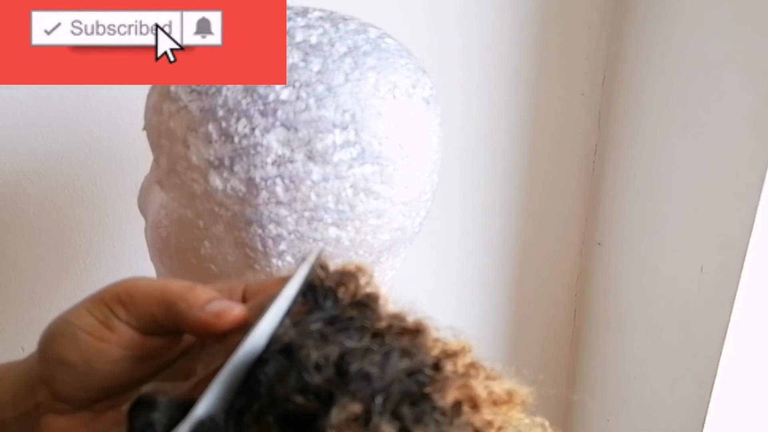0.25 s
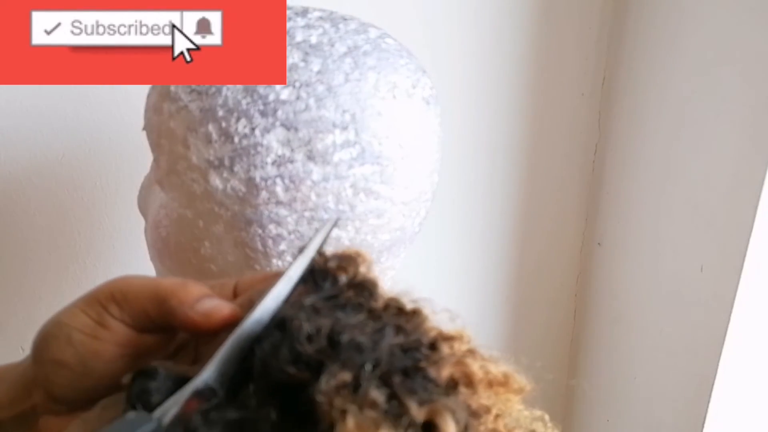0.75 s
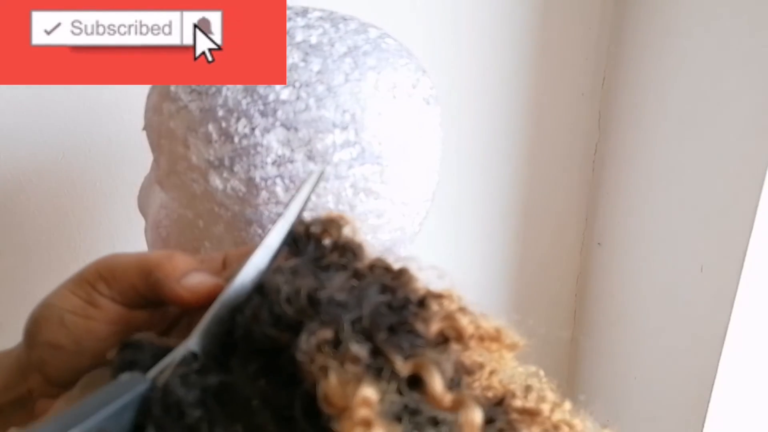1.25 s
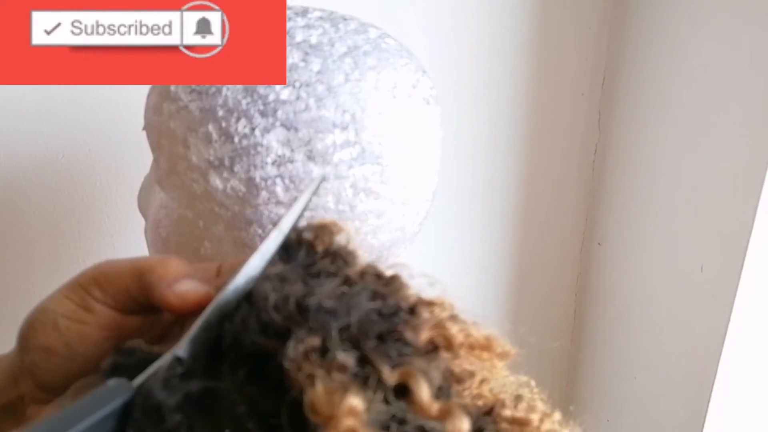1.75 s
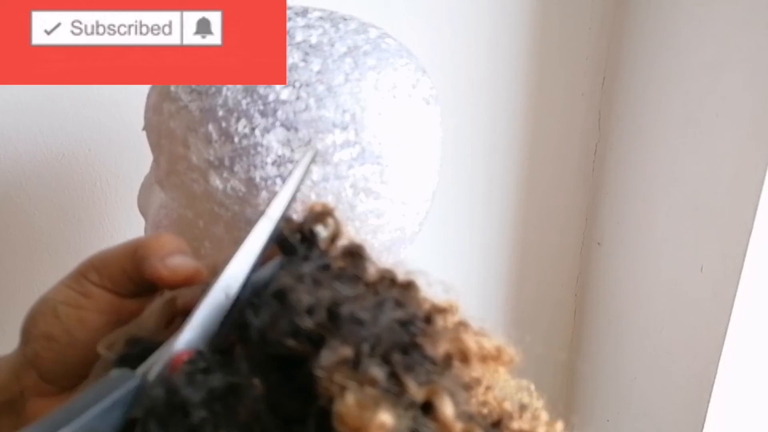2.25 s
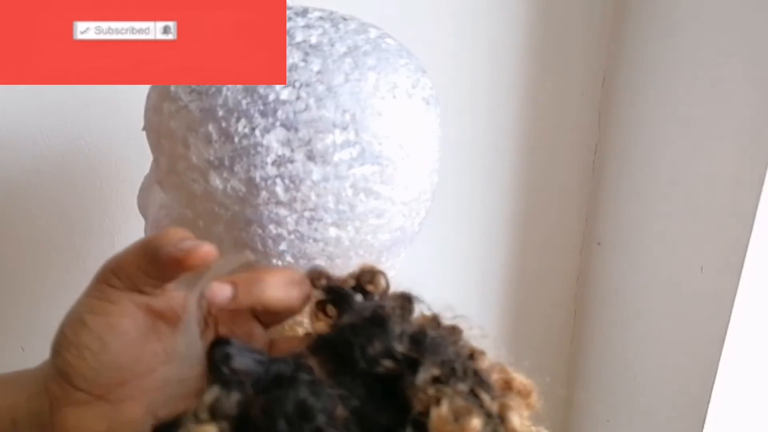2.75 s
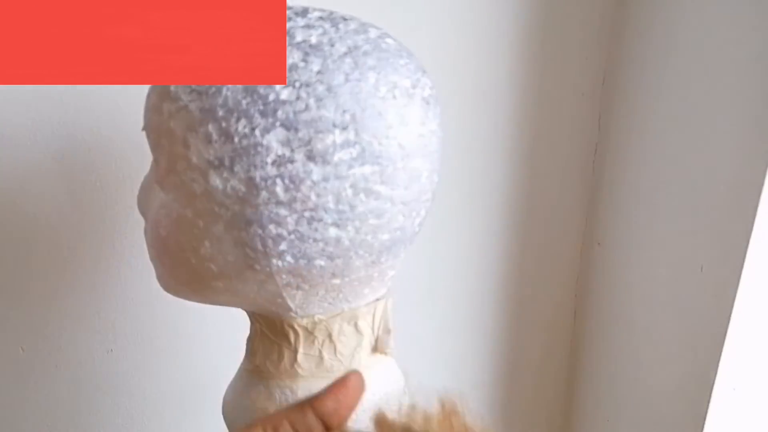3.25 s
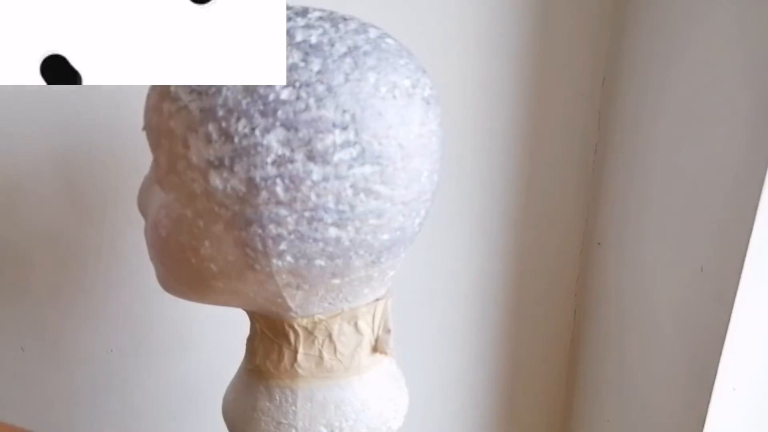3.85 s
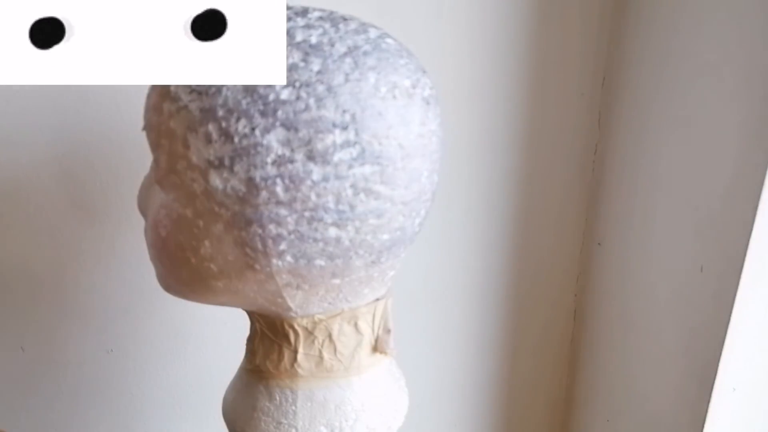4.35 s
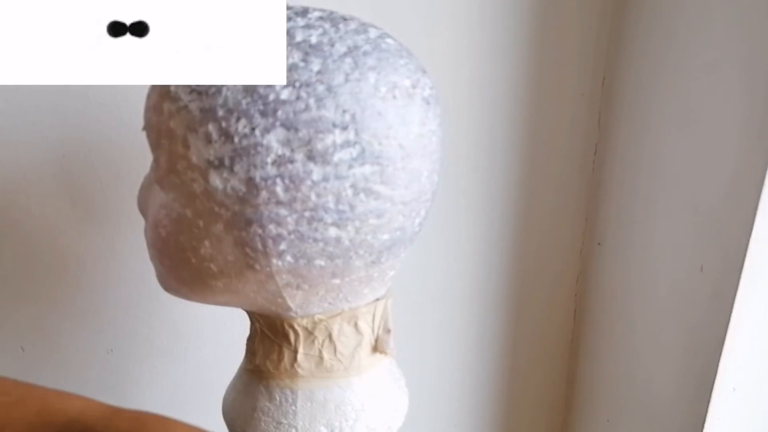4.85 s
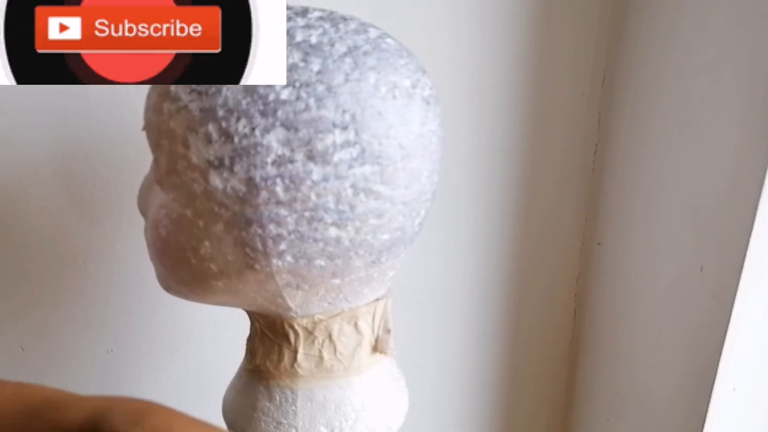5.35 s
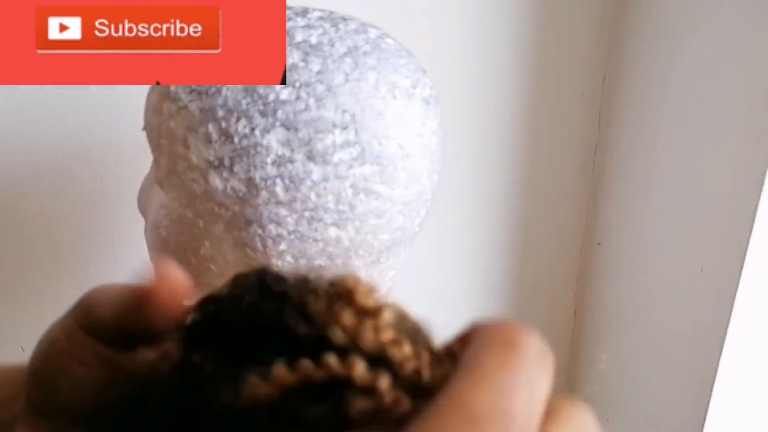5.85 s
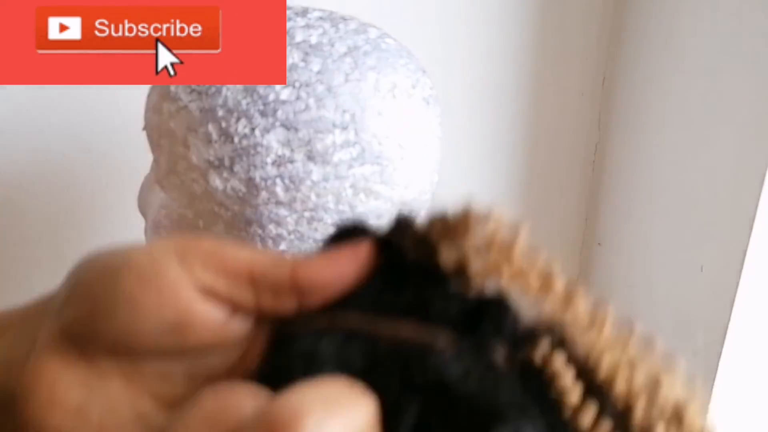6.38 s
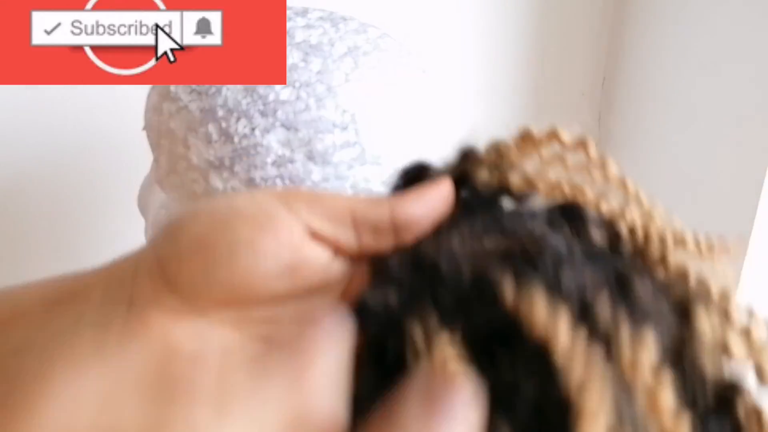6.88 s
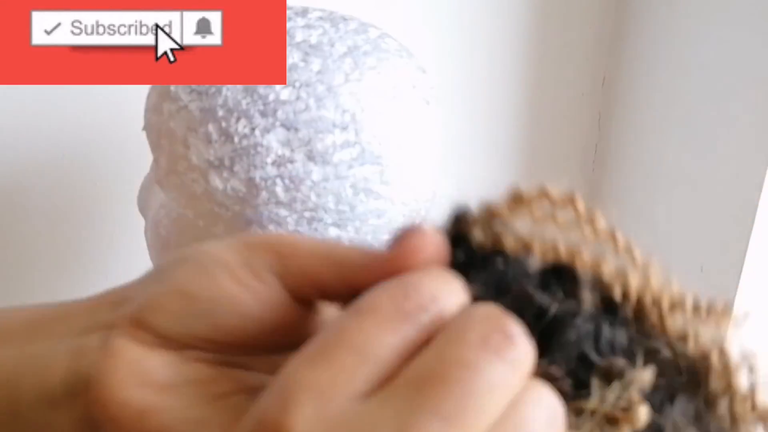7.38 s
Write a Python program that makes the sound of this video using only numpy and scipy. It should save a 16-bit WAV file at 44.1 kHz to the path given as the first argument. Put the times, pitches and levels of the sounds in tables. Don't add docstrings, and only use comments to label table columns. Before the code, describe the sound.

Crisp, dry clusters of snapping strands, mostly towards the left, as scissors bite through a wig. Faint hollow knocks sit further off. Hissing fibres swell as the wig is turned and moved away, metal scissors clack and chatter on a wooden surface, then quiet handling returns with airy rustles. Stereo phone pickup, slightly reverberant small room, light background hiss.

```python
import sys
import numpy as np
from scipy import signal
from scipy.fft import rfft, irfft
from scipy.io import wavfile
from scipy.ndimage import uniform_filter1d

SR = 44100
rng = np.random.default_rng(int(sys.argv[2]) if len(sys.argv) > 2 else 0)


def attenuation_scalar(level_db):
    decades = np.asarray(level_db, float) / 20
    return 10 ** decades


def materialize(psi):
    bounded = np.clip(np.atleast_2d(psi).T, -1, 1)
    quanta = np.round(bounded * 32767).astype(np.int16)
    wavfile.write(sys.argv[1], SR, quanta)


N = 335953

# (peak [s], rise [s], fall [s], crunch [dB], left minus right [dB])
BITES = [(0.73, 0.028, .3, -63.5, 6), (0.86, .02, .03, -55, 5), (0.878, 0.0088, 0.04, -43, 3),
         (0.897, 0.033, 0.016, -44.5, 5), (0.92, .01, 0.049, -46, 4.5), (0.957, .015, 0.04, -47, 12),
         (0.995, .02, 0.036, -53, 4), (1.06, 0.011, 0.022, -53, 11), (1.25, 0.046, .03, -60, 19),
         (1.275, .03, 0.096, -56, 4), (1.45, 0.034, .2, -64, 12), (1.52, 0.099, 0.046, -51, -1),
         (1.558, 0.023, 0.042, -46, 6.5), (1.612, .008, .03, -47, 13), (1.63, 0.011, .012, -38, 7.5),
         (1.651, 0.025, 0.024, -46.5, 18), (1.9, .005, 0.016, -49, 5), (2.03, 0.023, 0.022, -49, 16),
         (2.07, 0.031, 0.027, -36, 5), (2.095, .01, 0.012, -36, 7), (2.12, .02, .02, -44, 0),
         (2.14, 0.016, 0.13, -45.5, -13.5)]
# (time [s], peak [dB], left minus right [dB])
TICKS = [(0.849, -34, 7), (0.8579, -41, 9), (0.863, -30, 4), (0.8674, -36, 5), (0.873, -27, 8),
         (0.881, -26, 5), (0.889, -36, 10), (0.8921, -30, 8), (0.8957, -26.5, 11), (0.9096, -42, 2),
         (0.9148, -26, 14), (0.9212, -34, 2), (0.927, -32, 3), (0.936, -30, 10), (0.9443, -31, 8),
         (0.949, -16.5, 8), (0.953, -25, 13), (0.96, -28, 7), (0.966, -35, 6), (0.97, -38, 6),
         (0.9756, -41, 2), (0.9814, -43, 0), (0.9886, -39, 9), (0.9937, -27, 8), (1.0092, -41, 1),
         (1.0399, -47, 6), (1.0562, -33, 13), (1.062, -32, 7), (1.0658, -32, 8), (1.083, -35, 14),
         (1.4408, -37, 7), (1.444, -46, 10), (1.4497, -45, 11), (1.4648, -41, 10), (1.4722, -40, 6),
         (1.4761, -31, 6), (1.4846, -36, 6), (1.517, -28, 8), (1.5531, -33, 10), (1.5561, -35, 3),
         (1.5586, -28.5, 10), (1.5637, -36, 6), (1.5983, -35, 8), (1.6028, -36, 12), (1.6097, -35, 9),
         (1.6157, -37, 7), (1.6193, -36, 6), (1.6252, -28, 11), (1.632, -23, -2), (1.6405, -27, 7),
         (1.6437, -36, 13), (1.6477, -16, 7), (1.6532, -21, 3), (1.6574, -32, 7), (1.6594, -23, 9),
         (1.6775, -34, 13)]
# (time [s], peak [dB])
BUNDLES = [(2.0166, -41), (2.0216, -35), (2.0252, -33), (2.0278, -42), (2.0331, -25), (2.042, -14.5),
           (2.0458, -22), (2.0533, -19), (2.0592, -18), (2.062, -15), (2.0653, -18), (2.0674, -9.5),
           (2.0755, -11), (2.0812, -17), (2.0886, -19), (2.0998, -22), (2.1022, -31), (2.1072, -29),
           (2.11, -26), (2.113, -17), (2.1155, -14), (2.1182, -15), (2.123, -14), (2.1248, -20),
           (2.1265, -17.5), (2.13, -27),
           (2.0588, -12), (2.0897, -10), (2.071, -24), (2.073, -17), (2.079, -25), (2.083, -20),
              (2.0925, -15), (2.094, -19), (2.097, -15), (2.134, -29), (2.14, -28)]
# (time [s], peak [dB], relative top octave [dB], left minus right [dB])
SNAPS = [(0.202, -36, -23, -1), (0.5235, -38.5, -1, 7), (0.717, -38, -14, -1), (0.7553, -31.5, -22, -3),
         (0.76, -36, -22, 2), (0.818, -37.5, -19, -2), (1.2258, -36, -3, -1), (1.2426, -37, -10, 4),
         (1.258, -22.5, 7.5, 6.5), (2.438, -34, -20, 7), (2.678, -40, -17, 0), (2.7044, -44, -17, 0),
         (2.903, -37, -17, 0), (3.27, -30, -19, -2), (3.274, -22, -19, -7), (3.2903, -22, -19, 0),
         (3.3267, -26, -21, 5), (3.3516, -26, -12, 3), (3.3724, -33, -17, 0), (3.3782, -28, -17, -6),
         (3.385, -38, -17, 0), (4.446, -40, -28, -13), (5.9142, -39, -11.5, 6), (6.4189, -36.5, -6, 13),
         (6.4859, -39, -14, 10), (6.5774, -35, -20, 0), (6.7576, -37, -11, 10), (6.7657, -33, -17, 3),
         (6.7714, -45.5, -22.5, 3), (7.0442, -40, -17, 4.5), (7.0855, -38, -17, 0), (7.4177, -40, -22.5, 9),
         (7.427, -39, -22, -2)]
# (time [s], peak [dB], relative top octave [dB], left minus right [dB])
THREADS = [
    (2.3708, -31, -10, 8),
    (3.3584, -23.5, -21, -11),
]
# (frequency [Hz], level [dB])
CUT_TONE = [(1500, -60), (2500, -47), (4000, -34), (5300, -17), (6000, 0), (9000, 4.5), (10800, -18),
            (11900, -22)]
# (frequency [Hz], left [dB], right [dB])
CUT_SHADE = [(7050, -0.5, -1), (7440, -3.5, -3), (8400, 0.5, -10.5), (9800, -3.5, -4), (10500, 4.5, -9),
             (12100, -6, 3), (12500, -6, -20), (14700, 7, 4)]
# (peak [s], rise [s], fall [s], rustle [dB], left minus right [dB])
STROKES = [(0.0, .1, 0.45, -62, -4.5), (0.2, 0.051, 0.3, -64, -4.5), (1.25, 0.15, 0.26, -59.5, -3),
           (2.37, 0.15, 0.24, -60, -3), (2.45, .03, 0.26, -59, 6), (2.6, 0.18, 0.11, -58.5, 1),
           (2.7, 0.22, 0.19, -48.5, -2), (2.815, 0.044, .12, -49, -3.5), (2.88, .08, 0.052, -54, -2),
           (2.945, 0.07, 0.085, -50.5, -2.5), (3.16, 0.15, .2, -59.5, -5.5), (3.285, 0.089, .15, -45, -1),
           (3.365, 0.087, 0.11, -40.5, -2.5), (3.72, 0.31, 0.14, -65.5, -5), (3.87, .04, .2, -74, -2),
           (4.05, 0.033, 0.075, -55.5, -0.5), (4.42, 0.72, 0.51, -68, -4.5),
           (5.55, 0.063, 0.45, -67.5, 5.5), (5.72, 0.27, 0.088, -66.5, -7), (5.835, 0.034, 0.26, -51, 0.5),
           (5.88, 0.043, 0.068, -54.5, 3.5), (5.94, 0.089, 0.14, -49.5, 0), (6.36, 0.035, 0.52, -62, 0),
           (6.58, 0.24, 0.19, -52.5, 0), (6.765, 0.0096, 0.095, -54.5, -2), (7.07, 0.11, 0.29, -50, -1),
           (7.23, 0.48, 0.084, -53, -2), (7.44, 0.38, 0.22, -62.5, -0.5), (7.62, 0.086, 0.09, -59.5, -1)]
# (peak [s], rise [s], fall [s], skin rub [dB], hollow cap [dB])
RUBS = [(0.13, .45, .012, -61, -52), (1.03, 0.19, 0.28, -66.5, -64.5), (1.21, .15, 0.078, -65, -57),
        (2.9, .1, 0.23, -55, -51), (3.49, 0.14, 0.2, -59.5, -51.5), (3.65, 0.036, 0.35, -64, -54.5),
        (4.42, .08, 0.19, -62.5, -77), (5.3, 0.014, 0.074, -70, -58), (5.41, 0.46, 0.14, -58, -61.5),
        (5.7, 0.29, 0.99, -64.5, -63), (6.1, 0.1, 0.22, -74, -69), (6.28, 0.22, 0.08, -69, -60),
        (6.51, 0.028, 0.15, -61.5, -67), (6.97, 0.11, 0.98, -54.5, -57.5), (7.19, 0.16, 0.11, -61, -51.5),
        (7.3, .4, 0.27, -55.5, -73), (7.49, 0.43, 0.13, -75.5, -55.5)]
# (frequency [Hz], level [dB])
HAIR_TONE = [(1200, -34), (2400, -9.5), (3500, 2), (5000, 1.5), (9000, 6), (16000, 1.5)]
# (frequency [Hz], width [Hz], level [dB])
RUB_MODES = [(1010, 650, 7.5), (1370, 300, -14.5), (1633, 93, 0.5), (2000, 410, 8), (2450, 260, 5.5),
             (2900, 910, 13.5), (4190, 390, 8)]
# (frequency [Hz], width [Hz], level [dB])
CAP_MODES = [(552, 23, -7), (603, 76, 27)]
# (time [s], peak [dB], relative treble [dB], handle [dB], table boom [dB])
DROPS = [(4.5153, -21, -5, -31.5, -33), (4.519, -24.5, 3, -24, -29), (4.5206, -34, 7, -16, -30),
         (4.569, -25, -3.5, -22, -25), (4.609, -34, -4, -14, -21), (4.648, -36, 4.5, -15, -15),
         (4.7482, -36, 0, -8, -19), (4.7526, -27.5, 3.5, -16, -22.5), (4.756, -43.5, 9, -17, -19),
         (4.762, -31.5, -4, -20, -21), (4.767, -36, -16, -14.5, -19), (4.8, -45, -29, -14, -4),
         (4.941, -9.5, -8.5, -32.5, -29), (4.979, -26.5, 1.5, -20, -18), (5.001, -16, -7, -28, -22),
         (5.017, -35, 8, -28, -30), (5.038, -19, -7, -33, -27.5), (5.072, -36.5, 5, -39, -9),
         (5.11, -56, -5, -31, 3)]
# (frequency [Hz], width [Hz], level [dB])
STEEL_MODES = [(1290, 90, -11.5), (1634, 190, -24.5), (1810, 152, -5), (2090, 200, -5), (2390, 210, -4.5),
               (2617, 150, -3.5), (2900, 120, -5.5), (3105, 150, -6), (3420, 180, -6.5)]
# (frequency [Hz], width [Hz], level [dB])
BLADE_MODES = [(1590, 9, -16.5), (1940, 11, -3), (2185, 18, 5), (6040, 16, -9.5)]
# (frequency [Hz], width [Hz], level [dB])
TABLE_MODES = [(271.5, 11.3, -1), (325, 30, 6.5), (384, 18, -7)]
LANDINGS_S = [
    4.515,
    4.752,
    4.941,
]
# (time [s], peak [dB], hollow pitch [Hz], relative 2-3.5 kHz [dB], relative 8-10 kHz [dB])
KNOCKS = [(0.019, -45, 650, -16, -18), (0.148, -31.5, 715, -20.5, -5), (0.721, -43.5, 920, -20, -9),
          (1.32, -43.5, 790, -0.5, -3), (1.428, -41.5, 800, -17, -1), (1.438, -37.5, 784, -14, -2),
          (1.488, -45, 725, -19, -7), (1.522, -62, 690, -22, -2), (1.81, -46, 1100, -5, -1),
          (1.824, -39, 1150, -12.5, -3), (1.915, -33.5, 910, -16, 3), (1.97, -60, 794, -21, -6),
          (2.891, -38.5, 520, -9.5, -13), (2.925, -61, 552, -20, -11), (3.485, -60, 614, -24, -12),
          (3.65, -54, 600, -23, -19), (7.135, -41, 1440, -8.5, -6), (7.155, -57, 1510, -6, -8),
          (7.195, -47, 600, -14, -13), (7.49, -54, 598, -16, -8)]
# (frequency [Hz], decay time [s])
ROOM_T60 = [(200, 0.42), (1000, 0.55), (2000, 0.53), (4000, 0.56), (8000, 0.43), (16000, 0.23)]
# (frequency [Hz], level [dB])
AIR_TONE = [(100, -31.5), (190, 3), (400, 8), (500, 2), (1500, -5.5), (3000, -10), (6000, -19),
            (16000, -28.5)]
# (frequency [Hz], share [0-1])
AIR_SHARED = [(40, 0.07), (300, 0.59), (900, 0.016), (4000, 0.035), (12000, 0.091)]
# (frequency [Hz], width [Hz], level [dB])
AIR_MODES = [(275, 60, -35), (356.6, 64.7, -31.5), (600, 35, -82)]
# (frequency [Hz], level [dB])
RUMBLE_TONE = [(20, -3.5), (50, 2.5), (75, -3.5), (95, -1.5), (125, 1), (170, -0.5), (260, -43.5)]
# (frequency [Hz], left [dB], right [dB])
PORTS = [(97.7, 3, 1.5), (710, 1.5, -0.5), (2250, -2, -2.5), (3210, 0, -0.5), (3930, -4, -4.5),
         (5280, 0.5, 6), (6460, 3.5, 9), (6720, -3.5, 12), (7910, 2.5, -4.5), (8550, 8.5, -3.5),
         (9470, 7, -14.5), (10430, 0, -7.5), (13580, -4.5, -5.5), (14600, -1, 1)]

TICK_S, SNAP_S, BUNDLE_S, LANDING_S = 0.00098, 0.0016, 0.0023, 0.0027


def cut():
    bite = effort(BITES, rest_db=-92) * slips()
    crunch = []
    for _ in "lr":
        body = colour(bite * rng.standard_normal(N), CUT_TONE)
        top = band(bite * attenuation_scalar(-12) * rng.standard_normal(N), 8100, 17000, order=3)
        crunch.append(attenuation_scalar(3) * body + attenuation_scalar(1) * top)
    near = attenuation_scalar(-3.5) * place(crunch[0], heading(BITES), 0, 0.32, crunch[1])

    s, db, pan_db = np.transpose(TICKS)
    near += attenuation_scalar(-6) * parting(s, db, -20, pan_db - 2, TICK_S, lo_hz=5930, top_gain_db=8, body_db=-30)
    near = band(near, 5260, 17000, order=3)
    near += attenuation_scalar(-33.5) * ring_ports(near, [(6000, 220, 0.081)])

    s, db = np.transpose(BUNDLES)
    lock = parting(s, db, -18, 4, BUNDLE_S, lo_hz=5140, top_gain_db=5, body_db=-21)
    near += attenuation_scalar(-8) * lock + attenuation_scalar(-9.5) * band(lock, 6000, 7700)
    near = colour_ports(near, CUT_SHADE)

    near += attenuation_scalar(-4.5) * parting(*np.transpose(SNAPS), SNAP_S, lo_hz=5500, top_gain_db=4, body_db=-18)
    near += attenuation_scalar(-2) * parting(*np.transpose(THREADS), SNAP_S, lo_hz=3650, top_gain_db=1, body_db=-24)
    near += attenuation_scalar(-43) * ring_ports(near, [(6290, 23, 0.0079)])
    return near + attenuation_scalar(-10) * room(near.mean(axis=0))


def slips():
    slips_per_s, slip_t60_s, spread_db, drag_db = 290, 0.0163, 0.5, -5
    gap, size = rng.standard_normal((N // 100, 2)).T
    s = np.cumsum(np.exp(0.49 * gap) / slips_per_s)
    inside = s < N / SR
    jolts = clicks(s[inside], spread_db * size[inside])
    return unit(unit(decay(jolts, slip_t60_s)) + attenuation_scalar(drag_db))


def parting(s, db, top_db, pan_db, length_s, lo_hz, top_gain_db, body_db):
    ports = []
    for side in (1, -1):
        side_db = db + side * pan_db / 2
        snap = contact(s, side_db, length_s) + clicks(s + 0.00036, side_db - 2)
        bright = band(snap, lo_hz, 13000, order=4)
        top = band(contact(s, side_db + top_db + top_gain_db, length_s), 12000, 18400, order=3)
        body = band(contact(s, db + body_db, 3 * length_s), 1730, 4600)
        ports.append(bright + top + body)
    return np.array(ports)


def hair():
    stroke = effort(STROKES, rest_db=-77) * attenuation_scalar(1.6 * walk(30))
    skin = effort(RUBS, rest_db=-83) * attenuation_scalar(1.7 * walk(16))
    hollow = effort(RUBS, rest_db=-86, column=4) * attenuation_scalar(-6)
    fibres, rub = [], []
    for _ in "lr":
        hiss = rng.standard_normal(N) + 0.7 * grains(900, t60_s=0.0047)
        fibres.append(unit(colour(hiss, HAIR_TONE)) * stroke)
        skin_noise = band(ring(rng.standard_normal(N), RUB_MODES), 600, 5400)
        cap_noise = band(ring(rng.standard_normal(N), CAP_MODES), 534, 830)
        rub.append(unit(skin_noise) * skin + unit(cap_noise) * hollow)
    rustle = attenuation_scalar(2) * place(fibres[0], heading(STROKES), 18, 0.21, fibres[1])
    return rustle + attenuation_scalar(-3.5) * place(rub[0], 4.8, 21, 0.17, rub[1])


def grains(per_s, t60_s):
    fired = (rng.random(N) < per_s / SR).astype(float)
    return unit(decay(fired, t60_s) * rng.standard_normal(N))


def drops():
    s, db, _, _, boom_db = np.transpose(DROPS)
    blow = clatter(LANDING_S) + attenuation_scalar(2) * band(clicks(s + 0.00108, db), 1400, 8300)
    blow += attenuation_scalar(-12) * band(ring(clicks(s + 0.000802, db), STEEL_MODES), 1200, 7000, order=3)
    blow += attenuation_scalar(-51) * ring(blow, BLADE_MODES)
    chatter = attenuation_scalar(-6.5) * np.array([clatter(0.014) * attenuation_scalar(1.74 * walk(220)) for _ in "lr"])
    boom = ring(contact(s, db + boom_db, 0.028), TABLE_MODES)
    boom = attenuation_scalar(-29) * band(boom, 205, 420, order=3)
    steel = place(blow, 0.464, 0, 1, blow) + chatter + attenuation_scalar(1.5) * room(blow)
    return steel + place(boom, 2.5, 0, 0.99, boom) + attenuation_scalar(-7) * room(boom)


def clatter(length_s):
    s, db, top_db, handle_db, _ = np.transpose(DROPS)
    steel = ring(contact(s, db + 3.5, 0.5 * length_s), STEEL_MODES)
    steel = attenuation_scalar(-21.5) * band(steel, 1255, 4900, order=4)
    crack = attenuation_scalar(3.5) * band(contact(s, db + top_db, 1.05 * length_s), 3860, 9140)
    crack += attenuation_scalar(-3) * band(contact(s, db + top_db, 1.47 * length_s), 8800, 13800)
    crack += attenuation_scalar(-10) * band(contact(s, db + top_db, 1.7 * length_s), 14000, 16000)
    handles = attenuation_scalar(19) * band(contact(s, db + handle_db, 2.62 * length_s), 455, 1006)
    return steel + crack + handles


def knocks():
    s, db, pitch_hz, mid_db, top_db = np.transpose(KNOCKS)
    push, dry = contact(s, db - 31.5, 0.016), np.zeros(N)
    starts = (s * SR).astype(int)
    for start, end, hz in zip(starts, np.append(starts[1:], N), pitch_hz):
        thud = np.pad(push[start:end][:SR // 8], (0, SR // 8))[:N - start]
        modes = [(hz, 130, 2), (1.165 * hz, 150, 1), (0.77 * hz, 100, -12), (1.59 * hz, 120, -8)]
        dry[start:start + len(thud)] += ring(thud, modes)
    dry += attenuation_scalar(6.5) * band(contact(s, db + mid_db - 3, 0.035), 1670, 3400)
    dry += attenuation_scalar(-7) * band(contact(s, db + top_db, 0.021), 7560, 9750)
    return attenuation_scalar(1) * place(dry, -0.6, 0, 0.96, dry) + attenuation_scalar(1) * room(dry)


def air():
    rumble_db, hiss_db, stirred_db, hiss_backoff_share = -61, -59, -13, 0.98
    share = np.clip(read(AIR_SHARED, np.fft.rfftfreq(N, 1 / SR)), 0, 1)
    left, own = rng.standard_normal(N), rng.standard_normal(N)
    right = irfft(np.sqrt(share) * rfft(np.roll(left, 20)) + np.sqrt(1 - share) * rfft(own), N)
    rumble = np.array([colour(side, RUMBLE_TONE) for side in (left, right)])
    hiss = np.array([colour(side, AIR_TONE) + ring(side, AIR_MODES) for side in (left, right)])
    dip_db, backoff_db = gain_db()
    steady = attenuation_scalar(hiss_db + hiss_backoff_share * backoff_db + 1.63 * walk(3.86))
    stirred = attenuation_scalar(stirred_db) * effort(RUBS, rest_db=-99, column=4)
    rumble_level = attenuation_scalar(rumble_db + dip_db + backoff_db + 0.8 * walk(1.43))
    return unit(rumble) * rumble_level + unit(hiss) * np.hypot(steady, stirred)


def gain_db():
    dip_db, recover_s, backoff_db = -4, 0.12, -2.5
    since_s = np.arange(N) / SR - np.array(LANDINGS_S)[:, None]
    dip = np.sum((since_s > 0) * np.exp(-np.maximum(since_s, 0) / recover_s), axis=0)
    return dip_db * dip, backoff_db * (since_s[0] > 0)


def room(x):
    t = np.arange(SR // 2) / SR
    tail = np.zeros((2, len(t)))
    for hz in 125 * 2 ** np.arange(8):
        octave = band(rng.standard_normal((2, len(t))), hz / np.sqrt(2), hz * np.sqrt(2))
        tail += octave * 1000 ** (-t / read(ROOM_T60, hz))
    tail *= np.clip(t / 0.01, 0, 1) / np.sqrt(np.sum(tail ** 2) / 2)
    return np.array([signal.oaconvolve(x, side)[:N] for side in tail])


def place(x, pan_db, lag, alike, other):
    right = np.sqrt(alike) * np.roll(x, lag) + np.sqrt(1 - alike) * other
    return np.array([x * attenuation_scalar(pan_db / 2), right * attenuation_scalar(-pan_db / 2)])


def contact(s, db, length_s):
    shape = np.zeros(N)
    length_s = max(length_s, 3e-4)
    for start_s, size in zip(s, attenuation_scalar(db)):
        i = int(start_s * SR)
        t = np.arange(min(int(9 * length_s * SR), N - i)) / SR / length_s
        shape[i:i + len(t)] += size * (1 - np.exp(-4 * t)) * np.exp(-t)
    return shape * rng.standard_normal(N)


def swells(rows, column=3):
    t = np.arange(0, N, 16) / SR
    s, rise_s, fall_s, db = np.array(rows)[:, [0, 1, 2, column], None].transpose(1, 0, 2)
    away = np.maximum((s - t) / np.maximum(rise_s, 0.002), (t - s) / np.maximum(fall_s, 0.002))
    return attenuation_scalar(db - 20 * away ** 1.55) ** 2


def effort(rows, rest_db, column=3):
    return np.repeat(np.sqrt(swells(rows, column).sum(axis=0) + attenuation_scalar(rest_db) ** 2), 16)[:N]


def heading(rows):
    power = swells(rows) + 1e-12
    return np.repeat(np.array(rows)[:, 4] @ power / power.sum(axis=0), 16)[:N]


def clicks(s, db):
    out = np.zeros(N)
    np.add.at(out, np.minimum((np.asarray(s) * SR).astype(int), N - 1), attenuation_scalar(db))
    return out


def decay(x, t60_s):
    return signal.lfilter([1], [1, -1000 ** (-1 / (t60_s * SR))], x)


def walk(rate_hz):
    hold = int(SR / rate_hz)
    steps = np.repeat(rng.standard_normal(N // hold + 1), hold)
    return unit(uniform_filter1d(uniform_filter1d(steps, hold), hold)[:N])


def unit(x):
    return x / np.sqrt(np.mean(x ** 2))


def ring(x, modes):
    out = 0
    for hz, width_hz, db in modes:
        pole = np.exp((2j * hz - width_hz) * np.pi / SR)
        out = out + attenuation_scalar(db) * signal.lfilter([1], [1, -pole], x).imag
    return out


def ring_ports(x, modes):
    return np.array([ring(side, modes) for side in x])


def band(x, lo_hz, hi_hz, order=2):
    sos = signal.butter(order, [lo_hz, min(hi_hz, 0.45 * SR)], "band", fs=SR, output="sos")
    return signal.sosfilt(sos, x)


def read(table, hz, column=1):
    table = np.array(table, float)
    return np.interp(np.log(np.maximum(hz, 1)), np.log(table[:, 0]), table[:, column])


def colour(x, table, column=1):
    size = 4096
    cepstrum = irfft(np.log(attenuation_scalar(read(table, np.fft.rfftfreq(size, 1 / SR), column))))
    cepstrum[1:size // 2] *= 2
    cepstrum[size // 2 + 1:] = 0
    return signal.oaconvolve(x, irfft(np.exp(rfft(cepstrum)))[:size // 2])[:N]


def colour_ports(x, table):
    return np.array([colour(side, table, column=k + 1) for k, side in enumerate(x)])


def scene():
    return cut() + hair() + drops() + knocks() + air()


def band_limit(x):
    return signal.sosfilt(signal.butter(12, 16780, fs=SR, output="sos"), x)


def record(dry):
    ported = colour_ports(dry, PORTS)
    ported += attenuation_scalar(-71.5) * band(rng.standard_normal(dry.shape), 6100, 17300)
    top_cut = signal.ellip(8, 0.2, 45, 15500, fs=SR, output="sos")
    return band_limit(signal.sosfilt(top_cut, ported))


dry = scene()
out = record(dry)
materialize(out)
```